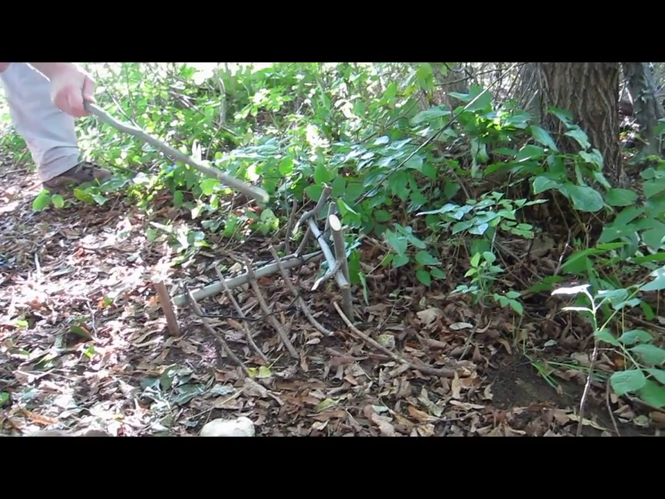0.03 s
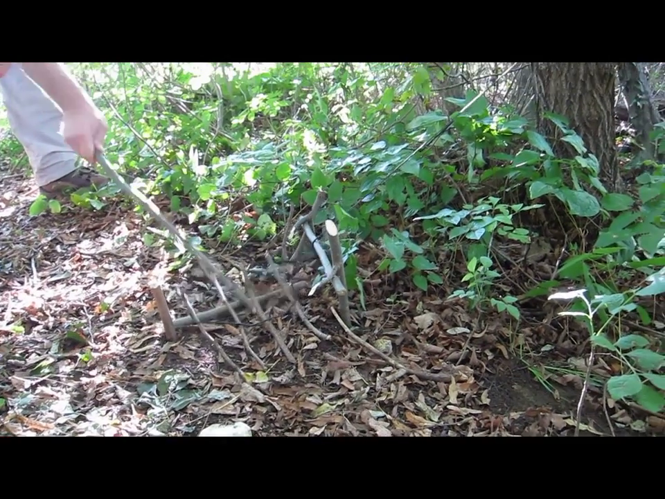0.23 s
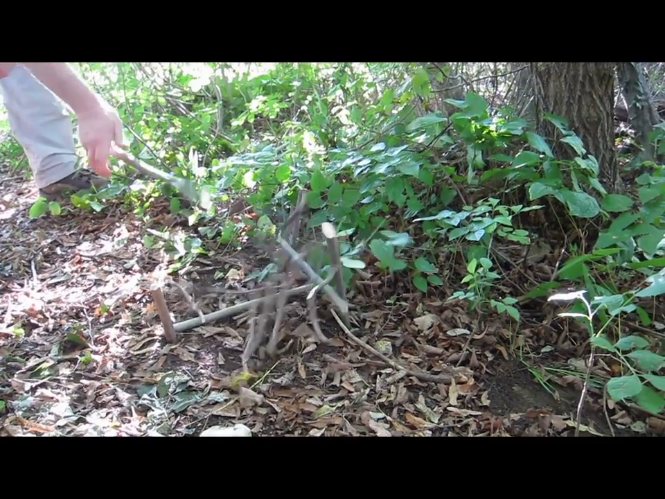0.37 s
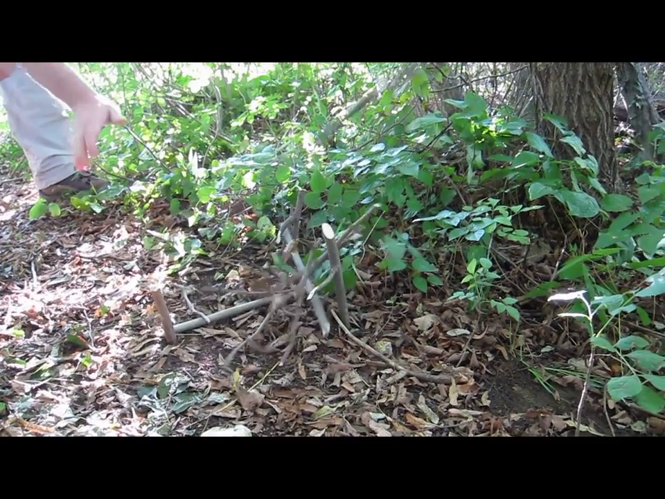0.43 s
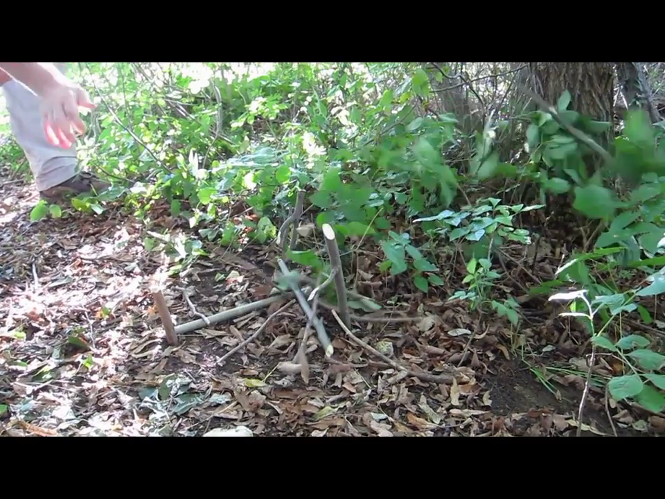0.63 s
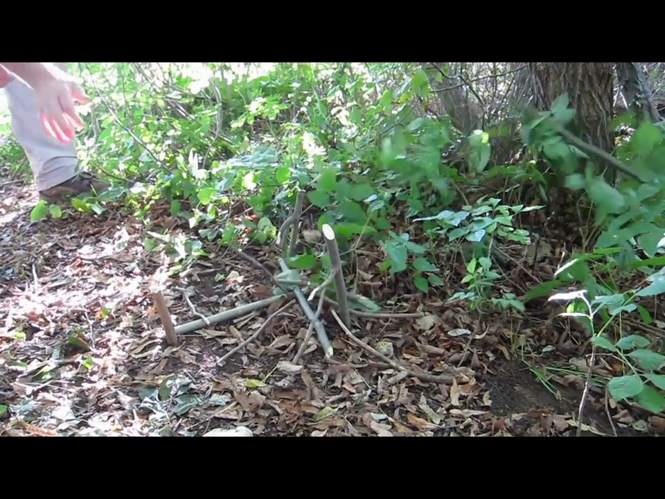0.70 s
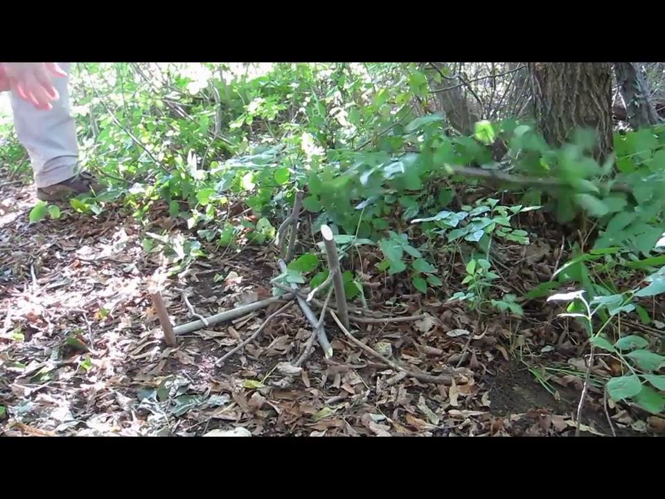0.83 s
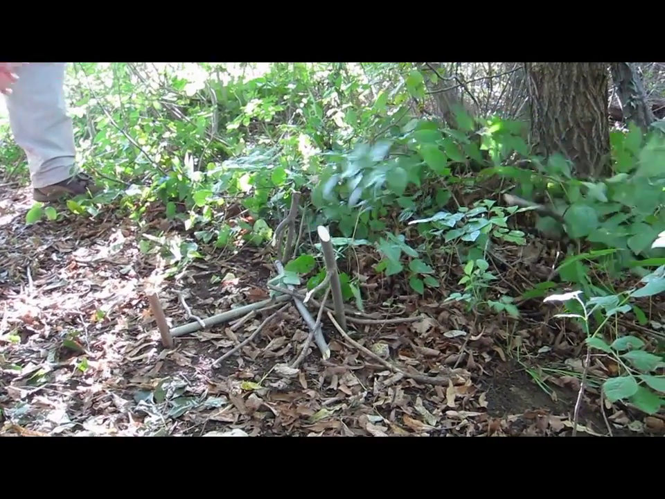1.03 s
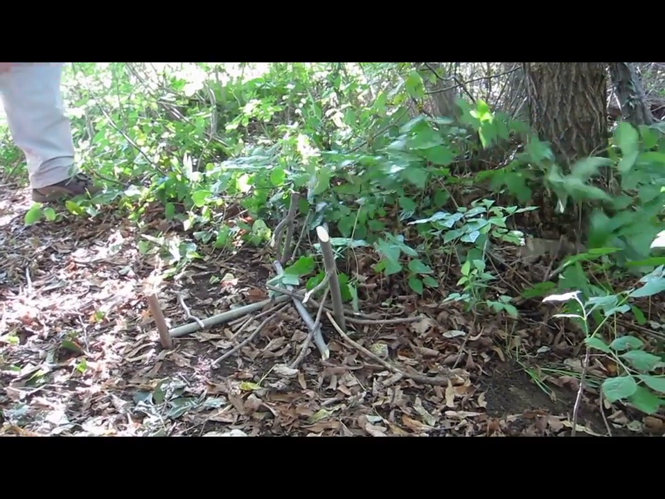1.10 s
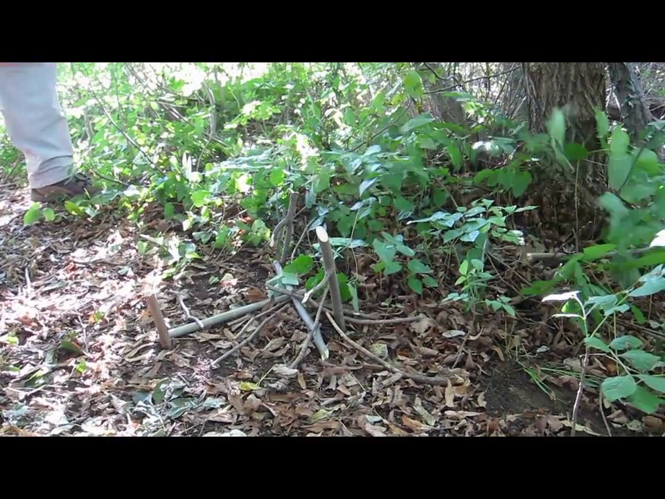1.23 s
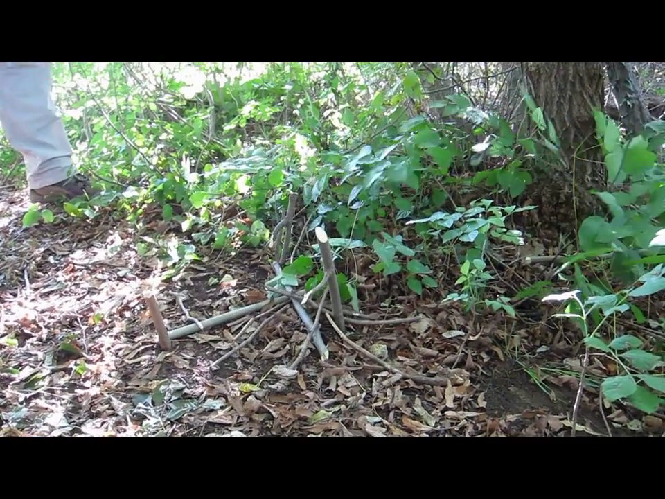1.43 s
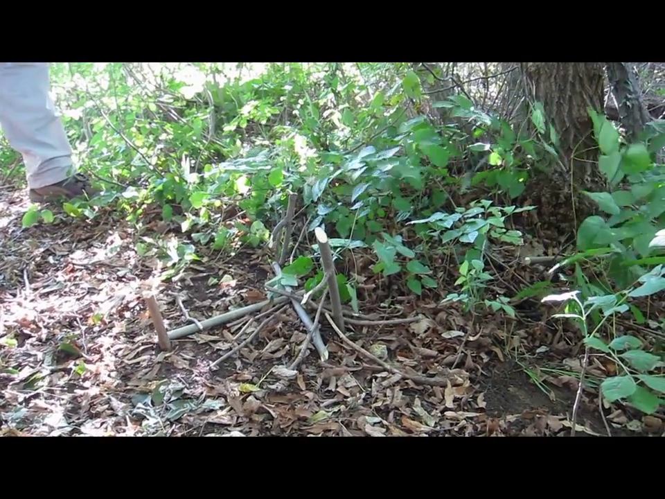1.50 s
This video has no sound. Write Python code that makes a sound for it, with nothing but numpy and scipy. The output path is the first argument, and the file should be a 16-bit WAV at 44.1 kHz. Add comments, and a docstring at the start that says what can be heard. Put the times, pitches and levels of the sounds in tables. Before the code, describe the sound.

A stick trap trips with a sharp wooden snap at about 0.2 seconds, followed by short scrapes, a dull thud and a loud clack near 0.35 seconds. Leaves rustle from the first snap as a sapling whips up, swelling again around 0.6 seconds, with twig ticks and soft thuds of wood on soil. The rustle settles by 1.4 seconds over a faint, low, distant rumble.

```python
"""A woodland floor, where a stick trap is tripped: the trigger snaps free and sticks scrape, thud and clack.
Struck sticks ring in damped modes, sliding bark crackles, dry twigs tick and wood lands dully on soil.
The released sapling whips up through the undergrowth; its leaves rustle, swing back and settle.
Trunks scatter faint echoes over a low distant rumble, and a gain control ducks after loud snaps."""
import sys
import numpy as np
from scipy import signal
from scipy.fft import rfft, irfft
from scipy.io import wavfile
from scipy.ndimage import uniform_filter1d

SR = 44100
rng = np.random.default_rng(int(sys.argv[2]) if len(sys.argv) > 2 else 0)


def wav_record(signal):
    """Record a signal, one row per channel, as 16-bit PCM in the file named by sys.argv[1]."""
    frames = np.transpose(np.atleast_2d(signal))
    bounded = np.clip(frames, -1, 1)
    # unit amplitude maps onto the largest positive 16-bit level
    quanta = np.round(bounded * 32767).astype(np.int16)
    wavfile.write(sys.argv[1], SR, quanta)


N = 68355

# Spectra of distant rumble, air, leaves, bark, cracks and soil: frequency_hz, relative_density_db
RUMBLE_SPECTRUM = [(15, -57), (25, -8.5), (54, -1.5), (135, -2), (184, -2.5), (243, -13.5), (364, -11.5),
                   (430, -21.5), (537, -18.5), (600, -42), (700, -19), (910, -58), (1540, -120)]
AIR_SPECTRUM = [(350, -17), (600, -7), (706, -5), (821, -8.5), (1120, -8.5), (1640, -12.5), (7840, -24),
                (10600, -19), (12000, -42), (15600, -63), (22000, -120)]
LEAF_SPECTRUM = [(180, -5.5), (300, -7.5), (367, -11.5), (515, -4), (857, -9), (940, -4), (1100, -8.5),
                 (2860, -2), (5460, -1.5), (8030, -9.5), (10400, -4), (11100, -9.5), (12000, -25),
                 (15600, -50), (22000, -120)]
BARK_SPECTRUM = [(200, -23), (800, -5.5), (2000, -3), (4000, -0.5), (6500, -1.5), (8300, -8), (10500, 1),
                 (12500, -21.5)]
CRACK_SPECTRUM = [(100, -22), (500, -2), (1400, 0.5), (3000, 1.5), (5500, -1), (8500, -11), (10800, -5),
                  (12500, -41)]
SOIL_SPECTRUM = [(40, -16), (130, -29), (450, 2), (900, -2), (1600, -30), (5000, -37)]
# Envelope of the sapling's rustle: time_s, level_db
RUSTLE_ENVELOPE = [(0, -73), (.15, -57), (.21, -57.5), (.24, -25), (.275, -31), (.302, -29), (.328, -24),
                   (.365, -29.5), (0.404, -26), (.44, -37.5), (.49, -33), (.56, -27), (.63, -26),
                   (.70, -31), (.81, -34.5), (0.922, -30.5), (.965, -34.5), (1.025, -29), (1.08, -34),
                   (1.18, -37.5), (1.22, -40), (1.35, -47.5), (1.55, -52)]
# Ticks of dry twigs: start_s, level_db, tilt_db_per_octave
TWIG_TICKS = [(0.09, -42.5, 10), (.169, -38, 0), (.2372, -23, 6), (.5105, -17.5, 8), (0.6039, -19.5, -2),
              (0.7532, -22, 2), (.841, -25, 1), (1.1019, -19.5, -5), (1.265, -31, 3)]
# Modes of the trigger stick, crossbar, loose sticks and small peg: pitch_hz, level_db, t60_s
TRIGGER_MODES = [(620, -28, 0.012), (1333, -25, 0.028), (2303, -3, 0.016), (2720, -15.5, 0.023),
                 (3785, -2.5, 0.015), (4290, -9.5, 0.017), (5460, -22, 0.019), (6800, -27, 0.024)]
CROSSBAR_MODES = [(1320, -25, 0.047), (2080, -9.5, 0.022), (2280, -15, 0.084), (2640, 0, 0.023),
                  (3150, -8.5, 0.028), (3375, -3.5, 0.021), (3680, -7, 0.017), (4260, -8, .011),
                  (4860, -10, 0.019), (7030, -12, 0.0044)]
LOOSE_MODES = [(527, -11, 0.024), (870, -4.5, 0.0082), (1440, -8, 0.046), (2230, -6.5, 0.079),
               (3135, 1.5, 0.037), (5000, -15, .02)]
PEG_MODES = [(2280, 5, 0.039), (2780, -20, 0.018)]
# Blows on each of them: start_s, ring_db, crack_db, ring_tilt_db_per_octave
TRIGGER_IMPACTS = [(.2139, -22, -14.5, -12.5), (0.2154, -0.5, -22, 0)]
CROSSBAR_IMPACTS = [(0.3323, -14.5, -13, 5), (0.3549, 1.5, -12.5, 5.5), (0.3611, -21, -29, -4)]
LOOSE_IMPACTS = [(.3735, -14.5, -18.5, -4.5), (.399, -33, -25, -2), (1.1018, -33, -36, -2),
                 (1.1799, -37.5, -28, 2)]
PEG_IMPACTS = [(.4972, -24, -23, 0)]
# Bark scraping through dry litter: start_s, length_s, level_db, tilt_db_per_octave
BARK_SCRAPES = [(0.2474, 0.0042, -15.5, 2), (0.2637, 0.0013, -21, 7), (0.282, 0.004, -23, 4),
                (0.2912, 0.004, -23.5, -0.5), (.314, 0.0075, -25, 2), (0.3205, 0.0066, -27.5, -1.5),
                (0.334, 0.0021, -21.5, -0.5), (0.396, 0.0051, -21, 0.5), (0.479, 0.035, -36, -1),
                (0.541, 0.0077, -22.5, -3), (0.558, 0.0022, -21, -1), (0.623, 0.0058, -26.5, -6),
                (0.754, 0.019, -31, -0.5), (.8393, 0.0047, -32, 1), (1.027, 0.013, -29, -1.5),
                (1.1, .075, -42, -4.5), (1.242, 0.031, -47.5, -6)]
# Landings of wood on soil: start_s, level_db, pitch_hz, t60_s
SOIL_THUDS = [(.251, -19, 151, .065), (0.253, -26, 275, .06), (.317, -36.5, 306, 0.027),
              (0.3737, -27.5, 474, 0.084), (0.544, -26, 356, .05), (0.6246, -22.5, 214.4, 0.061),
              (1.029, -35, 330, 0.05), (1.1005, -31, 480, 0.041)]
# Spectrum of the woodland echoes: frequency_hz, relative_density_db
ECHO_SPECTRUM = [(150, 5), (2500, -13), (11000, -3)]
# Bands of the leaves' swish: edge_hz
SWISH_EDGES = [150, 900, 2000, 3500, 5500, 8500, 13000]


def undb(db):
    """Decibels to amplitude ratio."""
    return 10 ** (np.asarray(db) / 20)


def unit(x):
    """Scale to rms 1."""
    return x / np.sqrt(np.mean(x ** 2))


def since(start):
    """Seconds since an event, zero before it."""
    return np.maximum(np.arange(N) / SR - start, 0)


def decay(t, t60):
    """Exponential damping: silent until t is positive, then falling 60 dB in t60 seconds."""
    return (t > 0) * np.exp(-np.log(1000) * t / t60)


def colour(x, spectrum, tilt_db=0):
    """Filter by a spectrum and a tilt per octave, with 18 dB per octave of roll-off outside; rms 1."""
    hz, db = np.array(spectrum, float).T
    octave = np.log2(np.maximum(np.arange(N // 2 + 1) * SR / N, 1))
    knots = np.log2(hz)
    outside = np.abs(octave - np.clip(octave, knots[0], knots[-1]))
    curve_db = np.interp(octave, knots, db) + tilt_db * octave - 18 * outside
    return unit(irfft(rfft(x) * undb(curve_db), N))


def noise(spectrum, tilt_db=0):
    """Gaussian noise with the given spectrum."""
    return colour(rng.standard_normal(N), spectrum, tilt_db)


def flutter(depth_db=1.26, per_s=90):
    """Random amplitude modulation: a gain that wanders smoothly about 1."""
    hold = int(SR / per_s)
    steps = np.repeat(rng.standard_normal(N)[:N // hold + 1], hold)
    return undb(depth_db * unit(uniform_filter1d(steps, hold)[:N]))


def ticks(per_s, spread_db):
    """A Poisson train of impulses, most weak and a few strong."""
    size = undb(spread_db * np.minimum(rng.exponential(size=N), 5))
    occurs = rng.random(N) < per_s / SR
    return unit(occurs * size * rng.choice([-1, 1], N))


def distant_ambience(rumble_db=-45, air_db=-55):
    """Stationary noise: a low distant rumble under a faint hiss of air."""
    return undb(rumble_db) * noise(RUMBLE_SPECTRUM) + undb(air_db) * noise(AIR_SPECTRUM)


def foliage(swish_db=-5):
    """Colliding leaves tick and friction between blades swishes; each size of leaf flutters on its own."""
    collisions = ticks(per_s=5000, spread_db=3)
    swish = np.zeros(N)
    for band in zip(SWISH_EDGES, SWISH_EDGES[1:]):
        bandpass = signal.butter(2, band, "band", fs=SR, output="sos")
        swish += signal.sosfilt(bandpass, rng.standard_normal(N)) * flutter()
    leaves = colour(collisions + undb(swish_db) * unit(swish), LEAF_SPECTRUM) * flutter()
    time_s, level_db = np.array(RUSTLE_ENVELOPE).T
    return leaves * undb(np.interp(since(0), time_s, level_db))


def twigs(t60_s=0.0081):
    """Thin dry twigs radiate broadband transients with no resonance."""
    return sum(undb(db) * noise(BARK_SPECTRUM, tilt_db) * decay(since(start), t60_s)
               for start, db, tilt_db in TWIG_TICKS)


def struck_stick(modes, impacts, contact_s=0.00034, crack_t60_s=0.024):
    """Modal superposition: each impact cracks and excites damped modes, neighbours in opposite phase."""
    out = np.zeros(N)
    centre_hz = np.mean([hz for hz, _, _ in modes])
    for start, ring_db, crack_db, tilt_db in impacts:
        t = since(start)
        ring = np.zeros(N)
        for k, (hz, db, t60) in enumerate(modes):
            amplitude = (-1) ** k * undb(db + tilt_db * np.log2(hz / centre_hz))
            ring += amplitude * decay(t, t60) * np.sin(2 * np.pi * hz * t)
        onset = 1 - np.exp(-(t / contact_s) ** 2)
        out += undb(ring_db) * ring * onset
        out += undb(crack_db) * noise(CRACK_SPECTRUM) * decay(t, crack_t60_s)
    return out


def scrapes(rise_s=0.00041, fall_s=0.0013):
    """Sliding friction of bark over bark and dead leaves gives short bursts of dense crackle."""
    out = np.zeros(N)
    for start, length, db, tilt_db in BARK_SCRAPES:
        envelope = (1 - np.exp(-since(start) / rise_s)) * np.exp(-since(start + length) / fall_s)
        crackle = colour(ticks(per_s=12000, spread_db=3), BARK_SPECTRUM, tilt_db)
        out += undb(db) * envelope * crackle
    return out


def thuds(rise_s=0.0016, upper_ratio=2.8, upper_db=-5.5, puff_db=-4):
    """Impact on soil excites two damped bending modes of the wood, with a dull puff of noise."""
    out = np.zeros(N)
    for start, db, hz, t60 in SOIL_THUDS:
        t = since(start)
        phase = 2 * np.pi * hz * t
        bending = np.sin(phase) + undb(upper_db) * np.sin(upper_ratio * phase)
        puff = undb(puff_db) * noise(SOIL_SPECTRUM)
        envelope = (1 - np.exp(-t / rise_s)) * decay(t, t60)
        out += undb(db) * envelope * (bending + puff)
    return out


def woodland_echoes(x, level_db=-17.5, delay_s=0.0076, t60_s=0.22):
    """Scattering from ground and trunks: convolution with a decaying train of random reflections."""
    reflections = colour(ticks(per_s=2700, spread_db=2.5), ECHO_SPECTRUM)
    response = reflections * decay(since(delay_s), t60_s)
    return undb(level_db) * signal.fftconvolve(x, response / np.linalg.norm(response))[:N]


def gain_control(x, threshold_db=-12.5, max_duck_db=6.5, duck_s=0.011, recover_db_per_s=5.5):
    """Compression: short-term power above a threshold lowers the gain quickly; it creeps back up."""
    power = uniform_filter1d(x ** 2, size=132, axis=-1)  # 3 ms mean
    excess_db = np.clip(10 * np.log10(np.maximum(power, 1e-12)) - threshold_db, 0, max_duck_db)
    recovery_db = recover_db_per_s * since(0)
    held_db = np.maximum.accumulate(excess_db + recovery_db, axis=-1) - recovery_db
    pole = np.exp(-1 / (duck_s * SR))
    duck_db = signal.lfilter([1 - pole], [1, -pole], held_db)
    return x * undb(-duck_db)


def scene():
    """Superposition of the direct sound, its echoes and the ambience, in one channel."""
    sticks = (struck_stick(TRIGGER_MODES, TRIGGER_IMPACTS)
              + struck_stick(CROSSBAR_MODES, CROSSBAR_IMPACTS)
              + struck_stick(LOOSE_MODES, LOOSE_IMPACTS)
              + struck_stick(PEG_MODES, PEG_IMPACTS))
    ambience = distant_ambience()
    direct = sticks + scrapes() + thuds() + twigs() + foliage()
    return (direct + woodland_echoes(direct) + ambience)[None]


def record(dry):
    """After gain control, soft saturation rounds the loudest peaks and a low-pass cuts the top."""
    saturation, cutoff_hz = 0.72, 11700
    rounded = saturation * np.tanh(gain_control(dry) / saturation)
    lowpass = signal.cheby1(12, 0.1, cutoff_hz, fs=SR, output="sos")
    return signal.sosfilt(lowpass, rounded)


dry = scene()
out = record(dry)
wav_record(out)
```